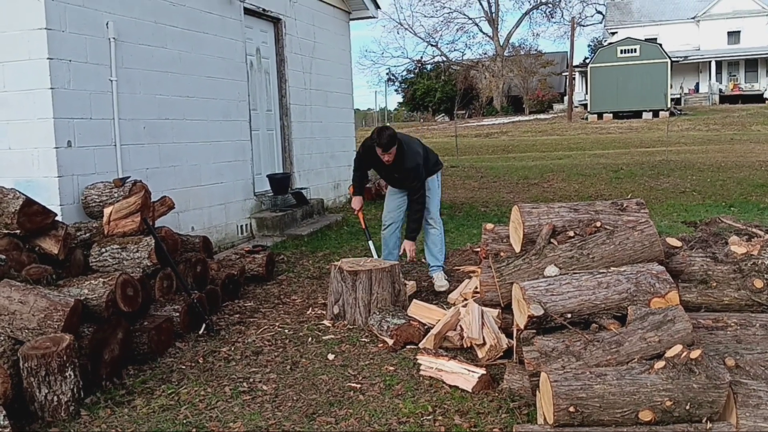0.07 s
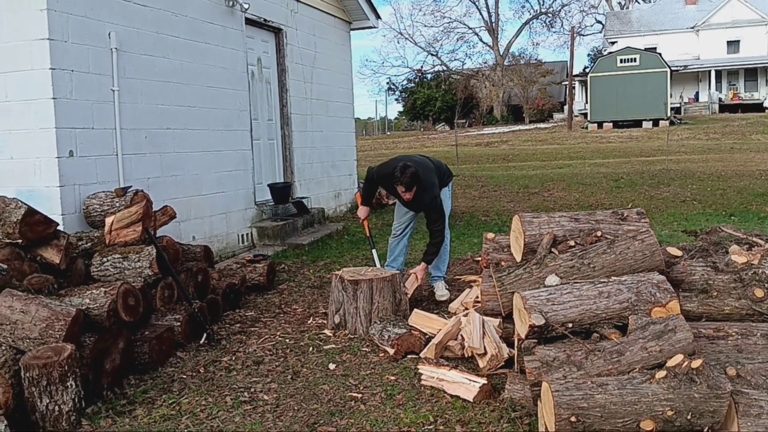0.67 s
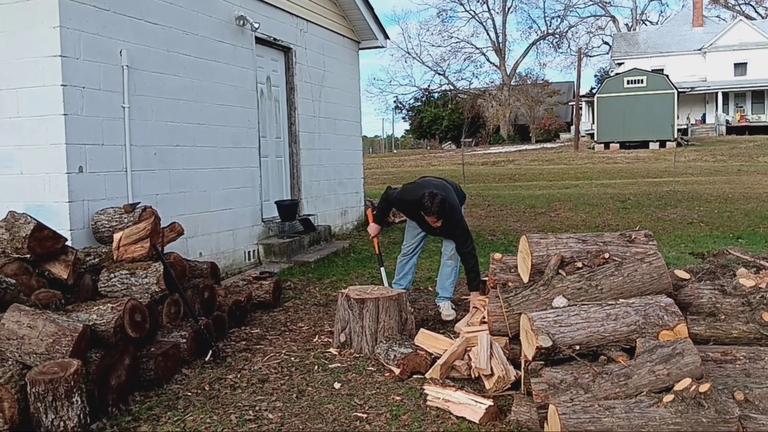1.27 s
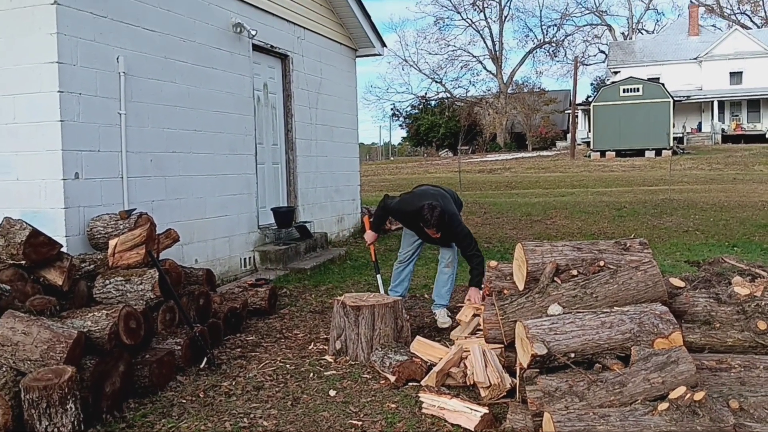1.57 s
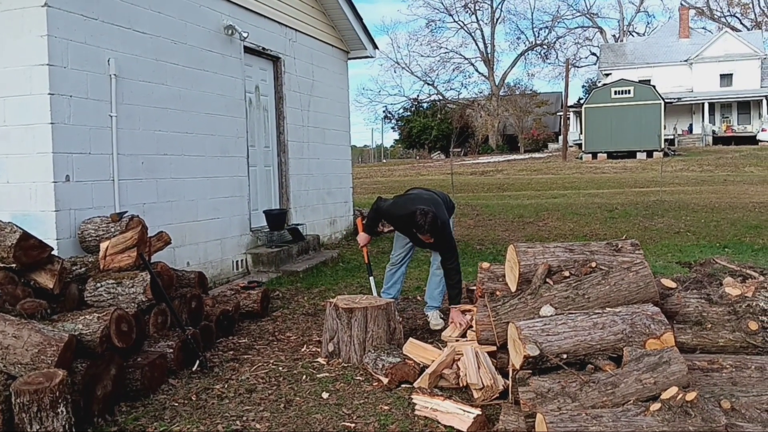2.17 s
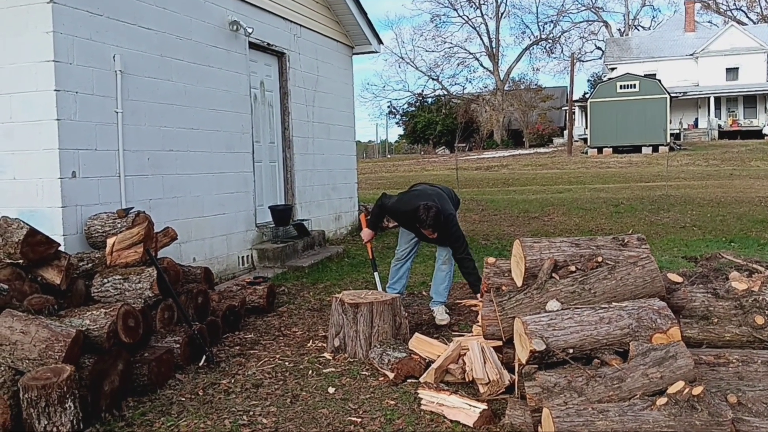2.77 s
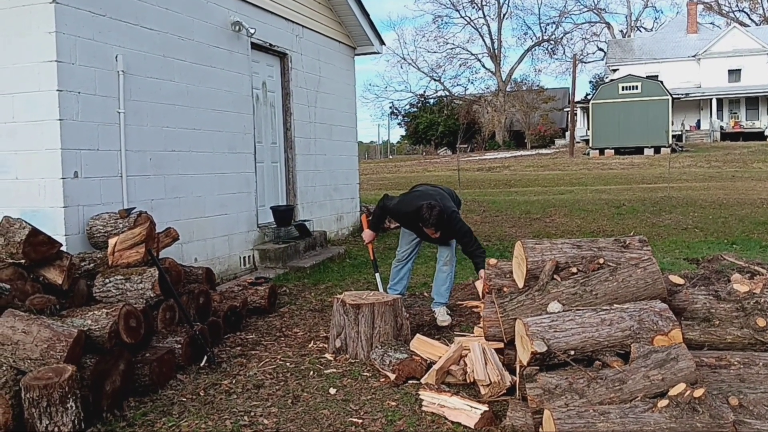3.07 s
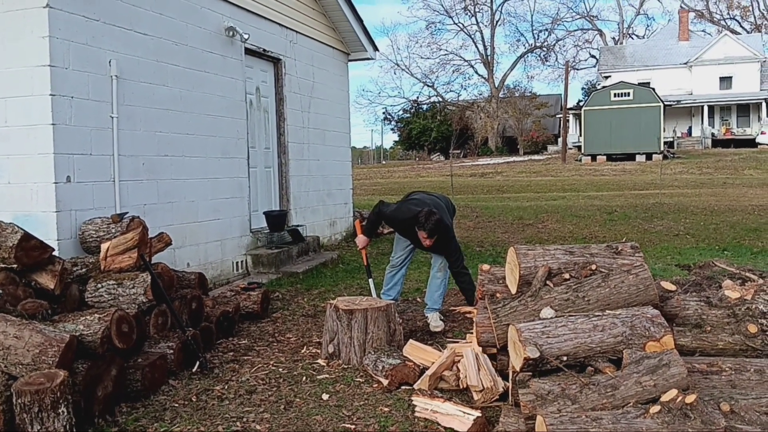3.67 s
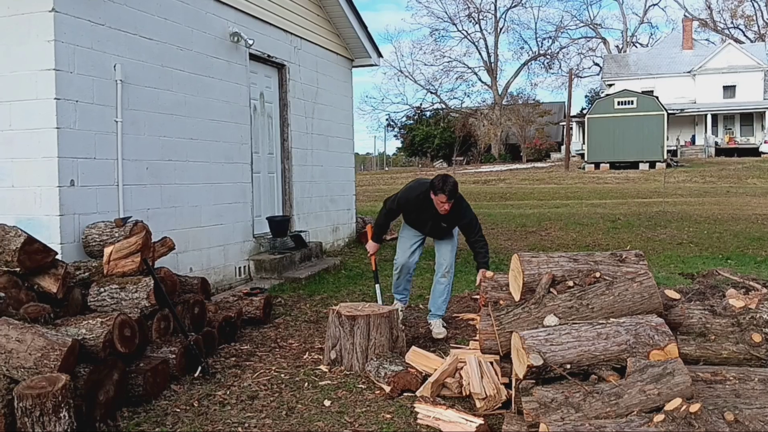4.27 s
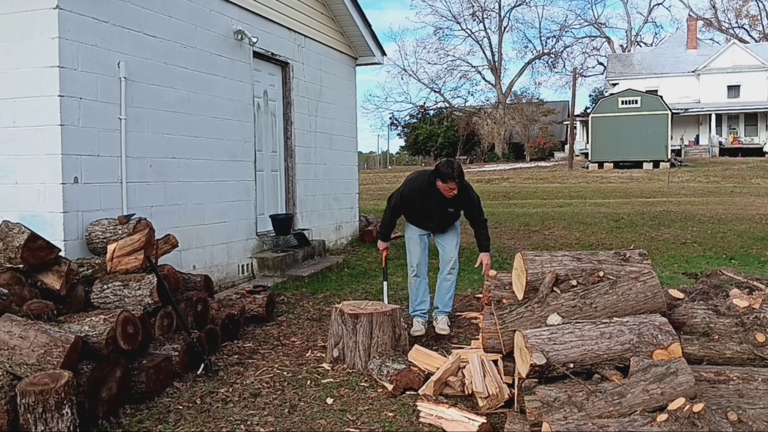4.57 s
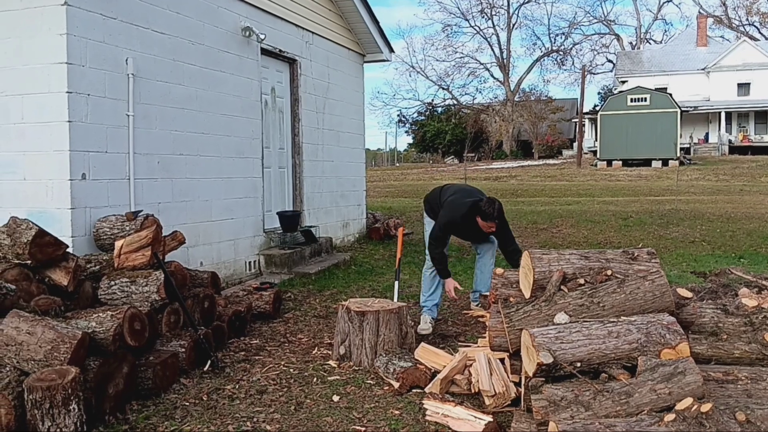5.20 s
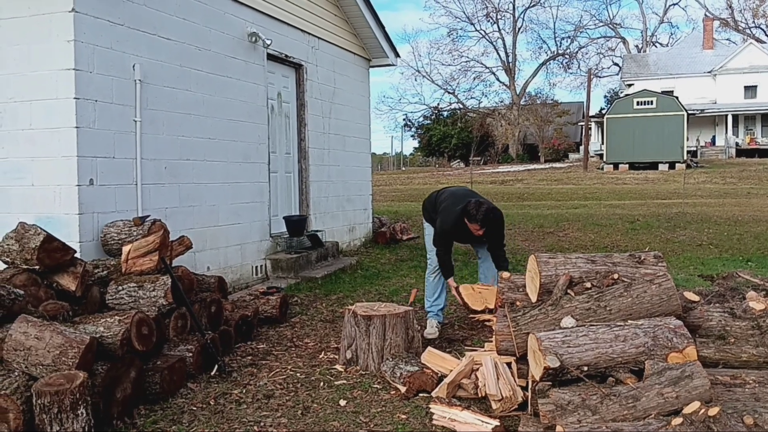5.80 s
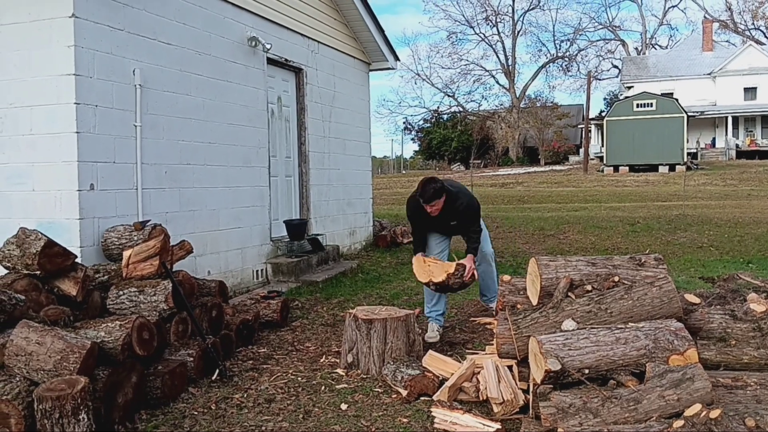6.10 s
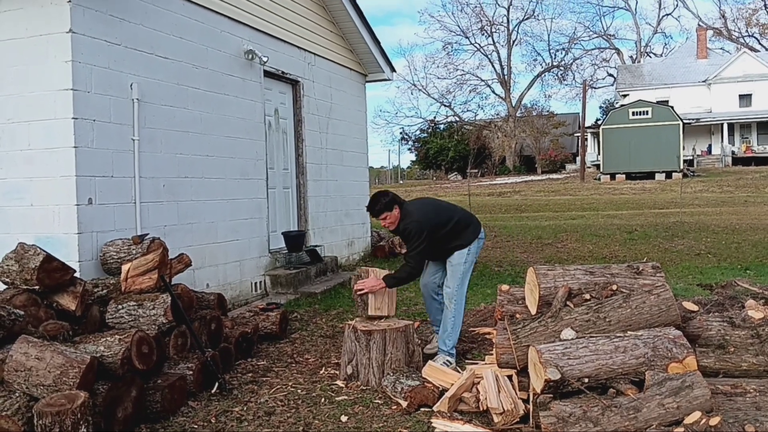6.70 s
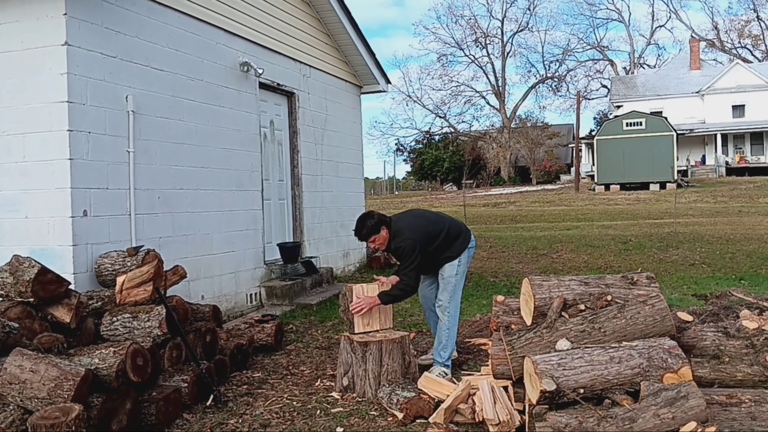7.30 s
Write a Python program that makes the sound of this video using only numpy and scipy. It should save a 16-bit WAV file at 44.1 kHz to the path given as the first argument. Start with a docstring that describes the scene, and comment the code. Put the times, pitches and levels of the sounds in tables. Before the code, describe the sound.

Hollow wooden clacks and boots crunching in dry litter lead to a log thumping onto a block, as wind buffets the microphone.

```python
"""Firewood clacks and clonks as it is tossed on a pile and shifted; then a heavy round thumps on the block.
Each blow rings the wood and thuds into what lies under it; dragged pieces catch, slip and rasp.
Wood and boots crunch in bark litter and dry leaves, which crackle on as they settle, and a block wall
and the woodpile answer. Far birds whistle and hoot; light wind rumbles on the two microphone ports."""
import sys
import numpy as np
from scipy import signal
from scipy.fft import rfft, irfft, next_fast_len
from scipy.io import wavfile
from scipy.ndimage import map_coordinates

SR = 44100
rng = np.random.default_rng(int(sys.argv[2]) if len(sys.argv) > 2 else 0)


def wav_out(sig):
    """Save sig, one row per channel (or a flat mono array), as 16-bit PCM at SR to the path in sys.argv[1]."""
    wavfile.write(sys.argv[1], SR, np.round(np.clip(np.atleast_2d(sig).T, -1, 1) * 32767).astype(np.int16))


N = 328498
T = np.arange(2 * SR // 5) / SR  # time within one short sound [s]
PILE_LAG, BOOT_LAG = .0009, .00142  # how much later the left port hears the woodpile and the boots [s]

# Ringing modes of each piece of wood: (frequency [Hz], level [dB], t60 [s])
SPLIT = [(1430, 4, 0.014), (1460, 0.5, 0.012), (2024, 2.5, 0.021), (2570, 4, 0.019), (3100, -1, 0.0099),
         (4560, -6, 0.012)]
CHUNK = [(675, 4.5, 0.026), (1161, 5.5, 0.024), (1439, -5.5, 0.025), (2630, -2.5, 0.012)]
SLAB = [(606, -5, 0.066), (760, -5, 0.04), (1320, 0, 0.018), (2230, 4, 0.012)]
STICK = [(1379, 8.5, 0.047), (1890, 8.5, 0.011), (2080, -4, 0.022)]
ROUND = [(752, -0.5, 0.033), (850, -6, 0.076), (776, 9.5, 0.014), (1120, -3.5, 0.031)]
# Low modes of the ground and the chopping block: (frequency [Hz], level [dB], t60 [s])
EARTH = [(204, -6.5, 0.062), (244, -4.5, 0.091), (308, 5.5, 0.015), (467, -7.5, 0.069)]
BLOCK = [(142.5, -10, 0.14), (215, -11, 0.061), (190, 7, 0.019), (318, -1, 0.026)]
# Spectra of bright cracking bark, dull rubbing and crisp leaves: (frequency [Hz], level [dB])
CRACK = [(600, -33.5), (1800, 2), (4000, 5.5), (7000, -1.5), (9200, 1), (12000, -8), (16000, 0.5)]
SCUFF = [(200, 1), (550, 2.5), (1000, -8.5), (2100, -3), (3200, -7), (6000, -28)]
LEAVES = [(300, -17.5), (1200, -17.5), (2200, -13), (4200, 0.5), (9200, -2), (12000, -8), (16000, -20)]


def firewood():
    """A dry split and a slab clack, a chunk clonks, a thin stick rings, the round thumps on the block."""
    # Wood knocking on wood: (time [s], piece, ring [dB], thud [dB], crack [dB])
    knocks = [(1.125, "slab", -70.5, -82, -77), (1.157, "slab", -54, -74.5, -49),
              (1.163, "split", -50.5, -53.5, -56.5), (1.202, "split", -37, -59.5, -44.5),
              (1.252, "split", -58, -60.5, -58), (2.661, "chunk", -40, -35, -54),
              (2.711, "chunk", -75, -48.5, -72.5), (2.746, "chunk", -68, -48.5, -64.5),
              (2.998, "chunk", -63, -58.5, -76), (3.366, "stick", -56.5, -83.5, -64.5),
              (3.386, "stick", -57, -59.5, -65), (3.446, "stick", -62.5, -58, -67.5),
              (3.484, "stick", -64, -54.5, -87), (4.134, "chunk", -53.5, -56, -66),
              (4.164, "slab", -52, -53, -59.5), (4.24, "split", -53.5, -55, -61),
              (4.259, "slab", -60.5, -59.5, -68), (4.389, "chunk", -69.5, -58.5, -76),
              (5.094, "round", -73, -58.5, -84), (6.422, "round", -62.5, -61.5, -80),
              (6.656, "round", -38.5, -27, -69.5), (6.702, "round", -54, -39.5, -64.5)]
    # Voice of each piece: (wood modes, support modes, contact time [s], crack t60 [s],
    # chatter [dB], scuff [dB], scatter [dB], tail [dB])
    pieces = { "split": dict(wood=SPLIT, support=EARTH, contact_s=0.00095, crack_t60=0.02, chatter_db=-20.5, scuff_db=-14, scatter_db=-13.5, tail_db=-12),
              "slab": dict(wood=SLAB, support=EARTH, contact_s=0.00021, crack_t60=0.016, chatter_db=-3.5, scuff_db=2, scatter_db=-1.5, tail_db=-19),
              "chunk": dict(wood=CHUNK, support=EARTH, contact_s=0.0036, crack_t60=0.027, chatter_db=-12.5, scuff_db=-17.5, scatter_db=-7, tail_db=-5.5),
              "stick": dict(wood=STICK, support=EARTH, contact_s=0.00053, crack_t60=0.0067, chatter_db=-7.5, scuff_db=-12, scatter_db=1, tail_db=-3),
              "round": dict(wood=ROUND, support=BLOCK, contact_s=0.0016, crack_t60=0.012, chatter_db=-9.5, scuff_db=-12.5, scatter_db=-16, tail_db=-6)}
    out = np.zeros((2, N))
    for s, piece, ring_db, thud_db, crack_db in knocks:
        add(out, s, knock(ring_db, thud_db, crack_db, **pieces[piece]))
    return out


def knock(ring_db, thud_db, crack_db, wood, support, contact_s, crack_t60,
          chatter_db, scuff_db, scatter_db, tail_db):
    """One blow rings the piece, thuds into what lies under it and crushes its rough surface."""
    crush = fade(crack_t60) * onset(contact_s) ** 2  # a soft contact builds up slowly
    rattle = burst(signal.fftconvolve(ring(wood, contact_s), chatter(chatter_db))[:len(T)])
    half_thud = amp(thud_db) * ring(support, contact_s=0.00059) / 2
    surface = amp(crack_db) * burst(grains(CRACK, spiky_db=7) * crush)
    scuff = amp(ring_db + scuff_db) * burst(grains(SCUFF, spiky_db=7.5) * crush)
    sound = amp(ring_db) * rattle + half_thud + surface + scuff + settling(crack_db)
    return outdoors(sound, scatter_db, tail_db) + ports(half_thud, PILE_LAG)  # half the thud stays dry


def ring(modes, contact_s, detune=0.016):
    """Damped modes, a little different for each point of contact."""
    hz, db, t60 = np.transpose(modes)[:, :, None]
    spread_db, shift = rng.standard_normal((2, len(modes), 1))
    waves = amp(db + spread_db) * fade(t60) * np.sin(2 * np.pi * hz * (1 + detune * shift) * T)
    return burst(waves.sum(0) * onset(contact_s))


def chatter(chatter_db):
    """Rough faces touch several times in one blow: a first contact, then a quick run of smaller ones."""
    touches = ticks(per_second=280) * fade(t60=0.017)
    return (T == 0) + amp(chatter_db) * touches / (np.linalg.norm(touches) + 1e-9)


def scrapes():
    """Wood drags over wood: rough fibres catch and slip, and every slip rings the piece."""
    # Drags: (middle [s], half length [s], piece, level [dB])
    drags = [(1.35, 0.0099, "slab", -75.5), (3.411, 0.025, "stick", -64.5), (4.142, 0.003, "round", -54.5),
             (4.171, 0.013, "slab", -52.5), (4.32, 0.14, "chunk", -77.5), (7.415, 0.062, "sawn face", -70)]
    # Modes of a sawn face: (frequency [Hz], level [dB], t60 [s])
    sawn_face = [(704, 0, 0.034), (1360, 1.5, 0.028), (2373, -1.5, 0.022), (3060, 4, 0.017),
                 (5280, -7.5, 0.02)]
    modes = {"stick": STICK, "slab": SLAB, "chunk": CHUNK, "round": ROUND, "sawn face": sawn_face}
    out = np.zeros((2, N))
    for s, half_s, piece, db in drags:
        slips = ticks(per_second=700)
        body = ring(modes[piece], contact_s=1 / SR, detune=0)
        rasp = unit(signal.fftconvolve(slips, body)[:len(T)])
        add(out, s - T.mean(), outdoors(amp(db) * swell(half_s) * rasp, scatter_db=-3, tail_db=-7))
    return out


def landings():
    """Wood, and now and then a heavy footfall, lands on the litter and stirs it up."""
    # Landings of wood and of heavy feet: (time [s], crunch [dB], thud [dB], thud pitch [Hz])
    drops = [(1.0762, -55, -58.5, 190), (1.147, -57, -64.5, 200), (1.8828, -53.5, -49, 170),
             (3.957, -63, -50.5, 159), (6.428, -70, -49, 320.8), (6.623, -84, -45, 114.8),
             (7.396, -70.5, -57.5, 197)]
    return crunches(drops, PILE_LAG, crush_t60=0.05, rub_db=2.5, stir_db=9)


def boots():
    """Boots press into the litter with a short, tight crunch."""
    # Footfalls: (time [s], crunch [dB], thud [dB], thud pitch [Hz])
    steps = [(3.8023, -60.5, -63.5, 431), (4.5601, -56, -44.5, 142.6), (5.0603, -57, -52, 218.6),
             (5.0889, -62.5, -54.5, 430.5), (5.4624, -66.5, -51.5, 138), (5.4904, -65.5, -59.5, 203.5),
             (5.5839, -72, -59, 355), (5.6233, -80, -57, 271), (5.837, -78, -53.5, 174.6)]
    return crunches(steps, BOOT_LAG, crush_t60=0.038, rub_db=-2, stir_db=-15)


def crunches(rows, lag_s, crush_t60, rub_db, stir_db, rise_s=.007):
    """Bark litter yields as the weight comes on, in a run of fractures over a soft thud."""
    out = np.zeros((2, N))
    press = fade(crush_t60) * onset(rise_s) ** 2
    for s, crunch_db, thud_db, hz in rows:
        litter = amp(crunch_db) * burst(press * grains(CRACK, spiky_db=8))
        rub = amp(crunch_db + rub_db) * burst(press * grains(SCUFF, spiky_db=4))
        sound = litter + rub + amp(thud_db) * hollow_thud(hz) + settling(crunch_db + stir_db)
        add(out, s - rise_s / 2, outdoors(sound, scatter_db=-12, tail_db=-10.5, lag_s=lag_s))
    return out


def hollow_thud(hz, sag=0.51, sag_s=0.011, overtone=1.6, overtone_db=-8):
    """A rough, hollow thud whose pitch sinks as more of the weight bears on the ground."""
    roughness = .14 * wobble(350, size=len(T))
    pitch = hz * (1 + sag * np.exp(-T / sag_s) + roughness)
    phase = 2 * np.pi * np.cumsum(pitch) / SR
    tone = np.sin(phase) + amp(overtone_db) * np.sin(overtone * phase)
    return burst(tone * fade(t60=0.12) * onset(rise_s=0.0059) ** 2)


def snaps(lead_s=.05, crumble_s=0.007, crumble_db=-22, edge_hz=1200, loud_db=-50, db_per_octave=14):
    """Twigs and bark flakes break amid crumbling neighbours; the smaller, the thinner they sound."""
    # The loudest breaks: (time [s], level [dB])
    breaks = [(2.65, -55.5), (3.1335, -62.5), (3.206, -70.5), (3.267, -77.5), (3.328, -58), (3.412, -62.5),
              (3.804, -53.5), (3.81, -56.5), (3.9404, -66.5), (4.068, -67), (4.145, -51), (4.234, -55.5),
              (4.5607, -52), (4.6911, -63), (4.771, -61.5), (5.09, -47.5), (5.329, -67.5), (5.362, -78),
              (5.378, -64), (5.401, -66), (5.4609, -60), (5.532, -74.5), (5.583, -60), (5.6515, -66.5),
              (5.68, -76), (5.952, -72), (6.716, -61.5)]
    out = np.zeros((2, N))
    since = T - lead_s
    strain = amp(crumble_db) * np.exp(-np.maximum(-2 * since, since / 2) / crumble_s)  # fast in, slow out
    for s, db in breaks:
        sound = strain * grains(CRACK, spiky_db=15)
        add(sound, lead_s, fade(t60=0.0074) * grains(CRACK, spiky_db=8))  # the break itself
        low_cut_hz = edge_hz * 2 ** ((loud_db - db) / db_per_octave)
        snap = burst(filtered(sound, lambda hz: hz / (hz - 1j * low_cut_hz)))
        add(out, s - lead_s, outdoors(amp(db) * snap, scatter_db=-9.5, tail_db=-18, lag_s=BOOT_LAG))
    return out


def slides(left_db=-3, clump_db=4):
    """Boots and wood slide over the ground: dry leaves crackle in clumps while bark rubs on bark."""
    # Slides: (middle [s], half length [s], leaves [dB], rubbing [dB])
    moves = [(2.254, 0.053, -82, -78), (3.15, 0.12, -83.5, -82.5), (4.064, 0.03, -66, -67.5),
             (4.204, 0.084, -72.5, -64), (4.702, 0.2, -79, -83.5), (5.237, 0.13, -78.5, -98),
             (5.384, 0.046, -68.5, -77.5), (5.679, 0.028, -70, -74), (6.248, 0.089, -83.5, -82.5),
             (6.944, 0.12, -85.5, -84)]
    out = np.zeros((2, N))
    for s, half_s, leaves_db, rub_db in moves:
        clumps = amp(clump_db * wobble(70, size=len(T)))
        leaves = amp(leaves_db) * unit(clumps * grains(LEAVES, spiky_db=10.5))
        bark = amp(rub_db) * grains(SCUFF, spiky_db=12)
        slide = swell(half_s) * (leaves + bark)
        add(out, s - T.mean(), outdoors(slide, scatter_db=-6.5, tail_db=-5.5, lag_s=BOOT_LAG))
    return out * amp([[left_db], [0]])


def settling(blow_db, relative_db=-15):
    """Leaves and crumbs of bark shaken by a blow crackle on as they come to rest."""
    return amp(blow_db + relative_db) * grains(LEAVES, spiky_db=9) * fade(t60=0.37) * onset(rise_s=0.13)


def grains(spectrum, spiky_db, grain_samples=32):
    """Tiny fractures of very unequal strength, rms 1; each patch of bark has its own resonances."""
    grain_db = spiky_db * np.minimum(rng.standard_normal(len(T) // grain_samples + 1), 2)
    strength = amp(grain_db).repeat(grain_samples)[:len(T)]
    resonances = np.transpose([np.geomspace(200, 16000, 60), 2 * rng.standard_normal(60)])
    crackle = strength * rng.standard_normal(len(T))
    return unit(filtered(crackle, lambda hz: amp(along(spectrum, hz) + along(resonances, hz))))


def wind(lumpy_db=4, shared=.3):
    """Lumpy rumble, mostly each port's own, that follows the strength of the wind there."""
    # Strength of the wind at each port: (time [s], level [dB])
    left_gusts = [(0, -74), (.6, -54.5), (.9, -76), (1.58, -79), (1.68, -49), (1.82, -66), (1.95, -55),
                  (2.74, -61), (3.05, -83.5), (3.18, -62), (3.7, -64), (3.92, -81.5), (4.25, -54),
                  (4.56, -54), (4.78, -80.5), (5.14, -59.5), (6.1, -84.5), (6.35, -59), (7.44, -71.5)]
    right_gusts = [(0.0, -61), (0.52, -62), (0.8, -83), (1.07, -54), (1.55, -40.5), (1.88, -52.5),
                   (2.26, -44.5), (3.36, -83.5), (4.64, -69.5), (5.18, -54), (5.26, -80.5), (7.44, -74)]
    # Spectrum of the buffeting: (frequency [Hz], level [dB])
    rumble = [(15, -25.5), (30, -1.5), (52, 4), (75, 1), (110, -8.5), (170, -22.5), (260, -35.5),
              (1000, -100)]
    flow = rng.standard_normal((2, N)) + shared * ports(rng.standard_normal(N), PILE_LAG)
    lumps = amp(lumpy_db * np.array([wobble(16), wobble(10)]))
    return amp([curve(left_gusts), curve(right_gusts)]) * unit(lumps * colour(flow, rumble))


def eddies(width_cycles=0.59):
    """An eddy swells and bursts on one port; a big one is slower and deeper."""
    # Bumps of air: (time [s], port, pitch [Hz], peak [dB])
    bumps = [(0.146, "right", 127, -29), (0.625, "left", 101, -42.5), (1.429, "right", 140, -27.5),
             (1.483, "right", 64, -30), (1.509, "right", 132, -31.5), (1.697, "left", 55.6, -39.5),
             (2.549, "left", 48.5, -40), (4.41, "left", 98, -35.5), (4.525, "left", 68, -37.5)]
    out = {"left": np.zeros(N), "right": np.zeros(N)}
    t = T[:SR // 5] - T[SR // 10]  # time around the middle of an eddy
    for s, port, hz, db in bumps:
        bump = np.cos(2 * np.pi * (hz * t + rng.random())) / np.cosh(2 * t * hz / width_cycles)
        add(out[port], s + t[0], amp(db) * bump)
    return np.array([out["left"], out["right"]])


def bird_whistle(start_hz=4240, step_hz=165, waver_hz=50, length_s=0.2, db=-88):
    """A far bird repeats a thin whistle that steps down through three pitches."""
    # Whistles: (start [s])
    calls = [.01, 1.41, 2.16, 2.89, 3.66, 6.77]
    out = np.zeros((2, N))
    progress = np.clip(T / length_s, 0, 1)
    for s in calls:
        pitch = start_hz - step_hz * np.floor(3 * progress) + waver_hz * wobble(500, size=len(T))
        whistle = np.sin(np.pi * progress) * np.sin(2 * np.pi * np.cumsum(pitch) / SR)
        add(out, s, amp(db) * outdoors(whistle, scatter_db=-8, tail_db=-10))
    return out


def bird_hoot(s=1.63, hz=920, half_s=0.029, db=-81):
    """A far bird gives one soft, pure hoot."""
    out = np.zeros((2, N))
    add(out, s - T.mean(), amp(db) * ports(swell(half_s) * np.sin(2 * np.pi * hz * T), PILE_LAG))
    return out


def air(db=-89):
    """The faint hush of open country."""
    # Spectrum of the hush: (frequency [Hz], level [dB])
    hush = [(120, -12.5), (200, -2.5), (300, -12.5), (2090, -19), (16000, -38)]
    return amp(db) * unit(colour(rng.standard_normal((2, N)), hush))


def outdoors(x, scatter_db, tail_db, lag_s=PILE_LAG):
    """A sound in stereo, with quick scatter from the logs and a longer answer from the yard."""
    # Decay of the yard's echo: (frequency [Hz], t60 [s])
    yard = [(100, 0.056), (300, 0.43), (1000, 0.19), (4000, 0.34), (14000, 0.13)]
    bands, t, noise = signal.stft(rng.standard_normal((3, len(T))), SR, nperseg=256)
    decay = np.exp(-np.log(1000) * t / along(yard, bands)[:, None])
    tail = signal.istft(noise * decay, SR, nperseg=256)[1][:, :len(T)]
    scatter = rng.standard_normal(tail.shape) * fade(t60=.07)
    reflections = amp(scatter_db) * unit(scatter) + amp(tail_db) * unit(tail)
    paths = reflections * onset(rise_s=0.00017) / np.sqrt(len(T))
    echo = signal.fftconvolve(x[None], paths, axes=1)[:, :len(T)]
    # long waves reach both ports alike, short ones do not
    width = lambda hz: np.arctan(hz / 700)
    common = filtered(echo[0], lambda hz: np.cos(width(hz)))
    diffuse = filtered(echo[1:], lambda hz: np.sin(width(hz)))
    return ports(x + common, lag_s) + diffuse


def ports(x, lag_s):
    """Sound from the right reaches the left port later."""
    return np.array([filtered(x, lambda hz: np.exp(-2j * np.pi * hz * lag_s)), x])


def amp(db):
    """Decibels to gain."""
    return 10 ** (np.asarray(db) / 20)


def unit(x):
    """Scale to rms 1."""
    return x / np.sqrt(np.mean(x ** 2) + 1e-20)


def burst(x):
    """Scale a short sound to the energy of 10 ms at rms 1."""
    return unit(x) * np.sqrt(.01 * SR / x.shape[-1])


def onset(rise_s):
    """An attack with time constant rise_s."""
    return 1 - np.exp(-T / rise_s)


def fade(t60):
    """A decay of 60 dB in t60 seconds."""
    return np.exp(-np.log(1000) * T / t60)


def swell(half_s):
    """A rise and fall around the middle of T."""
    return np.exp(-abs((T - T.mean()) / half_s) ** 1.3) * signal.windows.tukey(len(T))


def ticks(per_second):
    """Impulses of random timing and strength."""
    return (rng.random(len(T)) < per_second / SR) * rng.standard_normal(len(T))


def wobble(rate, size=N):
    """A smooth random curve, rate knots a second."""
    knots = rng.standard_normal(int(size * rate / SR) + 4)
    return map_coordinates(knots, [np.arange(size) * rate / SR])


def along(points, hz):
    """Read (frequency [Hz], value) points on a log axis."""
    frequencies, values = np.transpose(points)
    return np.interp(np.log(hz + 1), np.log(frequencies), values)


def curve(rows):
    """(time [s], value) rows as one value per sample."""
    return np.interp(np.arange(N) / SR, *np.transpose(rows))


def filtered(x, response):
    """Filter x by a function of frequency."""
    n = x.shape[-1]
    padded = next_fast_len(n + 4096)
    return irfft(rfft(x, padded) * response(np.fft.rfftfreq(padded, 1 / SR)), padded)[..., :n]


def colour(x, points):
    """Equalise x with (frequency [Hz], gain [dB]) points."""
    return filtered(x, lambda hz: amp(along(points, hz)))


def add(track, s, sound):
    """Mix a sound into the track at time s."""
    part = track[..., max(0, round(s * SR)):][..., :sound.shape[-1]]
    part += sound[..., :part.shape[-1]]


def scene():
    """Wood and boots up front; wind, birds and still air behind."""
    handling = landings() + boots() + firewood() + snaps() + slides() + scrapes()
    return handling + wind() + eddies() + bird_whistle() + bird_hoot() + air()


def record(dry, top_hz=16100):
    """The left port is fuller and duller than the right; both cut off steeply at the top."""
    # Tone of each port: (frequency [Hz], gain [dB])
    left_tone = [(100, 8.5), (1400, 5), (2800, 1), (5000, 5.5), (7800, 0), (9500, -13.5), (12000, -23.5),
                 (16000, -20.5)]
    right_tone = [(100, 0), (1400, -2), (2800, -1.5), (5000, 7), (9500, 12.5), (16000, -1.5)]
    coloured = np.array([colour(dry[0], left_tone), colour(dry[1], right_tone)])
    return filtered(coloured, lambda hz: 1 / (1 + (hz / top_hz) ** 160))


dry = scene()
out = record(dry)
wav_out(out)
```